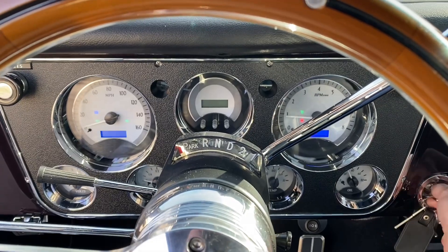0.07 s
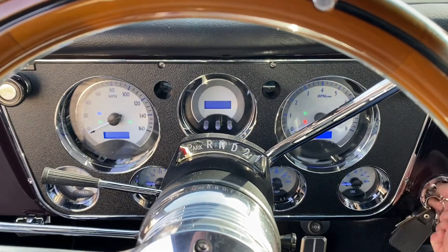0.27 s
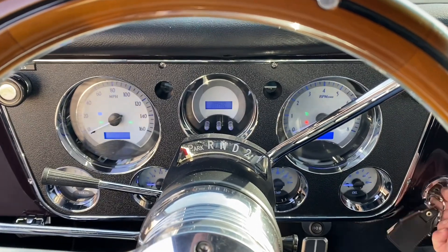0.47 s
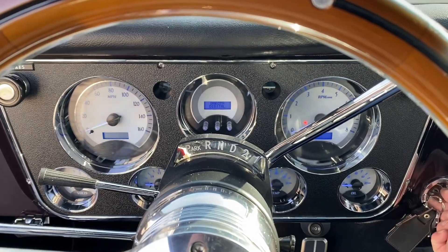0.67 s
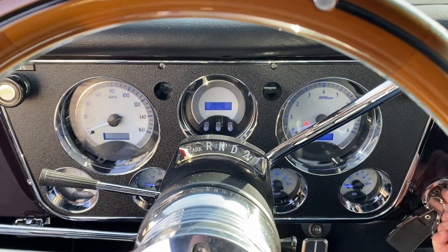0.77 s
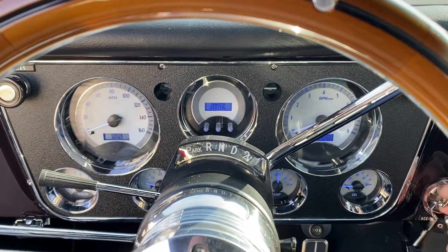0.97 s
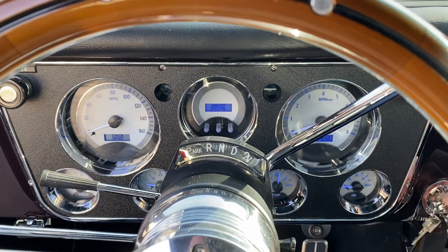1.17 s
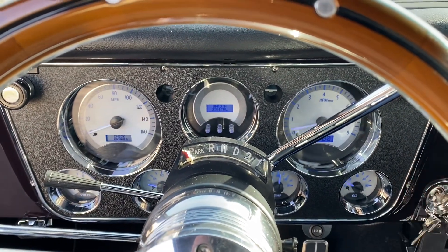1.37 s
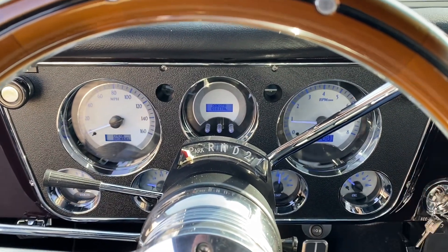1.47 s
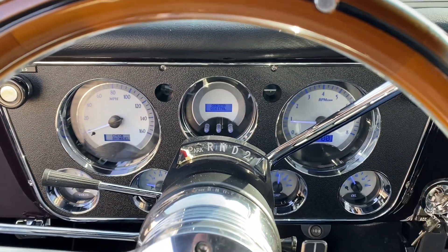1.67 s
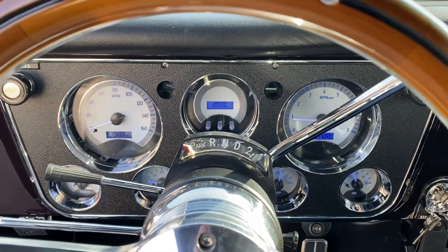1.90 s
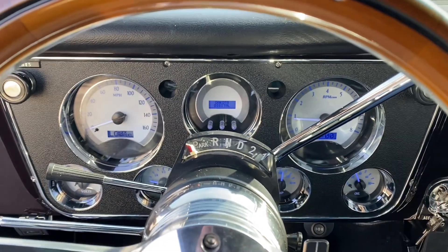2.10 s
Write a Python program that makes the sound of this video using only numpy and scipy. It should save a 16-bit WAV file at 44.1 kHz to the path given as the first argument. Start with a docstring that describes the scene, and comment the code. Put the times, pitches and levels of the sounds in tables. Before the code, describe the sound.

An eight-cylinder pickup engine starts, heard close inside the cab on a phone: small key and lock clicks, a very short rough starter whine, a breathy catch, then a loud, low, slightly hunting idle to the end.

```python
"""Cab of an eight-cylinder pickup, heard on a phone: the engine starts.
Key, lock and solenoid click: decaying noise and metal rings. The starter whines and cranks: a gliding rough
tone, its rasp, shaped noise and a hum. The intake gasps: noise paced by the firings. A hunting idle booms:
tones at one and two times the firing rate plus rung panels, over valve-gear hiss and a faint yard."""
import sys
import numpy as np
from scipy import signal
from scipy.fft import rfft, irfft
from scipy.io import wavfile
from scipy.ndimage import uniform_filter1d

SR = 44100
rng = np.random.default_rng(int(sys.argv[2]) if len(sys.argv) > 2 else 0)


def natural_amplitude(level_db):
    """Convert a level in decibels to a linear amplitude factor, elementwise."""
    exponent = np.asarray(level_db, float) / 20
    return 10 ** exponent


def waveform_to_disk(signal):
    """Save audio, clipped to [-1, 1], as 16-bit WAV at the path in sys.argv[1]."""
    frames = np.transpose(np.atleast_2d(signal))
    scaled = np.clip(frames, -1, 1) * 32767
    samples = np.round(scaled).astype(np.int16)
    wavfile.write(sys.argv[1], SR, samples)


N = 94374
T = np.arange(N) / SR
HZ = np.fft.rfftfreq(N, 1 / SR) + 1  # offset keeps the logarithm finite

# Yard background spectrum: f/Hz, relative density/dB
YARD_COLOUR = [(20, -49), (40, -8.5), (101, -2), (194, -20.5), (242, -16.5), (315, -29), (356, -21.5),
               (500, -27.5), (620, -38), (1750, -35.5), (5440, -64), (8000, -67), (10400, -104),
               (17600, -120)]
# Valve gear and belts: t/s, level/dB
VALVE_LEVEL = [(0.66, -36), (0.75, -40.5), (0.89, -31.5), (0.93, -35.5), (1.08, -40.5), (1.13, -34.5),
               (1.206, -41), (1.34, -39.5), (1.45, -45), (1.57, -45.5), (1.704, -40), (1.85, -42),
               (2.016, -42), (2.12, -43.5)]
# Valve gear spectrum: f/Hz, relative density/dB
VALVE_COLOUR = [(300, -22.5), (520, -6), (700, -2.5), (1100, -7), (1500, -8.5), (1900, -3.5), (2400, -5),
                (3000, -18), (5000, -27.5)]
# Air drawn through the intake, with valve gear: t/s, relative level/dB
INTAKE_LEVEL = [(.44, -49), (.55, -48.5), (.62, -42.5), (.7, -38), (.77, -32.5), (.82, -30), (.885, -27.5),
                (.92, -36.5), (1.0, -39.5), (1.07, -42.5), (1.135, -38.5), (1.21, -46), (1.3, -44.5),
                (1.41, -40), (1.52, -45.5), (1.6, -42), (1.65, -44), (1.75, -39), (1.82, -45),
                (1.89, -42.5), (1.94, -47), (1.985, -42), (2.03, -48), (2.14, -50.5)]
# Intake spectrum: f/Hz, relative density/dB
INTAKE_COLOUR = [(410, -17), (700, -12), (1420, -5), (2010, -9.5), (3070, -4), (5000, -6), (7640, -10.5),
                 (8360, -15.5), (9750, -10), (11000, -12.5), (13400, -24), (15100, -18)]
# Key, lock and solenoid clicks: t/s, peak level/dB of the noise part, t60/s
CLICKS = [(0, -44, 0.063), (0.163, -62.5, 0.13), (0.185, -46, 0.18), (0.236, -32, 0.11),
          (0.3207, -41, 0.11), (0.3503, -39, 0.24), (0.569, -27, 0.1), (0.949, -28, 0.042),
          (1.1237, -28.5, 0.067), (1.1667, -33, 0.086), (1.973, -45, 0.12)]
# Click spectrum: f/Hz, relative density/dB
CLICK_COLOUR = [(290, -23), (500, -11.5), (1240, 3), (3000, -2), (3270, -4.5), (3510, -4), (3670, -1.5),
                (8020, -15), (11000, -13.5), (15000, -32)]
# Ring of lock and solenoid: f/Hz, width/Hz, relative level/dB
LOCK_MODES = [(1264, 14, -1.5), (3290, 110, 0.5), (3830, 14, -2), (4090, 45, 0), (5210, 31, 0),
              (5910, 50, 2), (6710, 45, -11), (7840, 98, -4)]
# Starter: t/s, gear mesh f/Hz, whine level/dB, crank rumble level/dB, relative gear grind level/dB
STARTER = [(.345, 900, -47, -58, -44.5), (.37, 937, -36, -30, -36), (.395, 981.5, -40, -22, -38),
           (.42, 989.3, -41, -21.5, -35.5), (.43, 1155, -40, -23, -35), (.465, 1157, -35.5, -22.5, -37),
           (.478, 1316, -35.5, -21.5, -35.5), (.496, 1433, -28, -28, -36.5), (.51, 1422, -35, -30, -35),
           (.528, 1445, -26, -22.5, -35.5), (.547, 1452, -41, -24, -33), (.565, 1388, -31.5, -26.5, -37),
           (.595, 1374, -30, -21, -35.5), (.61, 1385, -39, -26.5, -39.5), (.622, 1375, -41, -26, -38.5),
           (.7, 1338, -67, -28.5, -39), (.8, 1316, -60, -29.5, -45)]
# Crank rumble resonances: f/Hz, width/Hz, relative level/dB
CRANK_MODES = [(48.7, 16, 4), (72.8, 23, 7), (128, 18, 2), (168.4, 33, -6.5)]
# Gear grind spectrum: f/Hz, relative density/dB
GRIND_COLOUR = [(150, 0), (250, -7.5), (705, -8.5), (1390, -8), (1560, -7), (2750, -15.5), (6920, -30.5),
                (8540, -52), (10400, -30), (12000, -69), (15600, -92), (22000, -120)]
# Motor hum, sags under load, climbs as the starter runs free: t/s, f/Hz, peak level/dB
MOTOR_HUM = [(.365, 140.1, -52), (.378, 133.4, -16.5), (.42, 121.6, -24), (.45, 120.7, -48),
             (.52, 128, -31), (.6, 128, -25), (.64, 138.8, -29), (.68, 158.8, -23), (.71, 168, -19.5),
             (.74, 163, -32), (.77, 161, -31)]
# Hunting idle: t/s, firing f/Hz
FIRING = [(0.76, 47.41), (0.82, 49.5), (0.902, 51.47), (0.978, 51.68), (1.128, 56.84), (1.152, 57.82),
          (1.298, 55.26), (1.432, 57.33), (1.594, 52.81), (1.604, 52.51), (1.724, 56.27), (1.74, 56.8),
          (1.886, 54.27), (1.912, 54.33), (1.996, 57.44), (2.008, 57.56), (2.1, 53.05), (2.14, 53.7)]
# Engine: t/s, boom level/dB at twice the firing rate, thump level/dB at the firing rate, body rumble level/dB
ENGINE = [(0.76, -23, -24, -30.5), (0.778, -21, -48, -31), (0.812, -19, -13, -24.5),
          (0.84, -20, -19.5, -27), (0.882, -21, -15, -23), (0.92, -5.5, -17, -24.5),
          (0.966, -21.5, -12.5, -24.5), (0.986, -7, -8, -20), (1.07, -11, -12, -26.5),
          (1.112, -9.5, -19, -20.5), (1.148, -5.5, -13.5, -29.5), (1.186, -10, -24, -23.5),
          (1.224, -8.5, -11, -21.5), (1.27, -8, -14.5, -30.5), (1.298, -8, -26, -22.5),
          (1.312, -6, -14, -27), (1.404, -9, -19, -21.5), (1.428, -8.5, -16, -28), (1.454, -6, -11, -21.5),
          (1.482, -10.5, -19.5, -26), (1.558, -10.5, -14.5, -27.5), (1.596, -6, -11.5, -24),
          (1.628, -14, -12.5, -26), (1.682, -7, -14, -21.5), (1.79, -9.5, -17.5, -26),
          (1.844, -11, -14, -26.5), (1.874, -5, -22.5, -23.5), (1.94, -11, -8, -26.5),
          (1.982, -7.5, -24, -21.5), (2.016, -8.5, -16, -29.5), (2.046, -14.5, -17, -26.5),
          (2.074, -9.5, -18, -24), (2.112, -10, -9.5, -26.5), (2.14, -13, -27, -34)]
# Body panel resonances: f/Hz, width/Hz, relative level/dB
PANEL_MODES = [(168, 26, 3), (207.4, 16.8, 1), (261, 41.6, -2.5), (338.7, 68, 1.5), (400.6, 26, -5),
               (444, 42.6, -4.5), (660, 244, -13)]
# Cab air resonance: f/Hz, width/Hz, relative level/dB
CAB_MODE = [(118.7, 10, 0)]
# Cab air rung by the ragged first firings: t/s, level/dB
CAB_MODE_LEVEL = [(.75, -45), (.78, -34), (.83, -15), (.87, -8), (.92, -16), (.95, -7), (1.0, -25),
                  (1.1, -46)]
# Dash and cab resonances added to every source: f/Hz, width/Hz, gain/dB
DASH_MODES = [(628.4, 9.9, 9.5), (844, 30, -6.5), (940, 48, -7), (1126, 41, 1), (1211, 15, -4.5),
              (1363, 16, -4.5), (1445, 20, -4), (1715, 14, -0.5), (1883, 21, 4.5), (3160, 47, -21),
              (4900, 310, -3.5)]
# Side signal gain: f/Hz, gain/dB
SIDE_GAIN = [(60, -7), (110, -17.5), (200, -3.5), (370, -8), (690, 0), (1270, 3), (2340, -1), (4320, -2),
             (7950, 1.5), (14600, -0.5)]
# Left over right: f/Hz, gain/dB
LEFT_OVER_RIGHT = [(30, -5.5), (60, -1.5), (250, -1), (600, -1), (1200, 3), (2500, 3.5), (5000, 3.5),
                   (8000, 0), (14000, -1)]
# Treble colour of the finished mix, dip near 8.5 kHz and gap near 12 kHz: f/Hz, gain/dB
TREBLE_COLOUR = [(20, 0), (8000, 0), (8500, -7), (9000, 0), (11200, 0), (11700, -6), (11800, -40),
                 (12350, -40), (12450, 0), (13800, 3), (14500, 0), (15200, -8), (22000, -10)]

YARD_DB, LOCK_DB = -40, -5
INTAKE_PUFF_DB, INTAKE_FLICKER_DB = 1, 2.96
CLICK_RISE_S, CLICK_GRIT_DB = 0.0028, 0  # no grit: smooth decays
MESH_ROUGH_HZ = (70, 10)  # rms pitch scatter at bite and at speed
MESH_SETTLE_START_S, MESH_SETTLE_LENGTH_S = 0.43, 0.05
MESH_FUZZ_HZ, MESH_FUZZ_DEPTH = 200, 0.35
SIDEBAND_OFFSET_HZ, SIDEBAND_DB = 190, -12
RASP_RATIO, RASP_BANDWIDTH_HZ = 2.2, 570
STARTER_FADE_S, CATCH_FADE_S = 0.18, 0.045
BOOM_LEAD_RAD = 0.14
PERIOD_SCATTER_CYCLES, FIRING_SCATTER_DB = 0.022, 1.8
PANEL_SCATTER_DB, PANEL_RATTLE_DB = 3, 2
ECHO_DB, ECHO_T60_S, ECHO_LOW_HZ = -7, 0.045, 408
SIDE_ECHO_SHARE = 0.78
CEILING, TOP_HZ = 1.15, 15150


def curve(table, col):
    """One column of a time table, joined by lines."""
    a = np.array(table, float)
    return np.interp(T, a[:, 0], a[:, col])


def over_hz(table):
    """Frequency table on the transform's bins, linear over log f."""
    a = np.array(table, float)
    return np.interp(np.log(HZ), np.log(a[:, 0]), a[:, 1])


def unit(x):
    """Scale to rms 1."""
    return x / np.sqrt(np.mean(x ** 2))


def noise(colour):
    """Noise of a given spectrum, rms 1."""
    return unit(irfft(rfft(rng.standard_normal(N)) * natural_amplitude(over_hz(colour)), N))


def rough(bandwidth_hz):
    """Low-passed noise, rms 1."""
    low = signal.butter(2, bandwidth_hz, fs=SR, output="sos")
    return unit(signal.sosfilt(low, rng.standard_normal(N)))


def ring(x, modes):
    """Resonances, each applied twice for dark valleys; sum at rms 1."""
    out = 0
    for hz, width_hz, db in modes:
        b, a = signal.iirpeak(hz, hz / width_hz, SR)
        twice = signal.lfilter(b, a, signal.lfilter(b, a, x))
        out = out + natural_amplitude(db) * unit(twice)
    return unit(out)


def walk(rate_hz):
    """Random levels held 1 / rate_hz s and slewed twice, rms 1."""
    k = int(SR / rate_hz)
    held = np.repeat(rng.standard_normal(N // k + 1), k)
    return unit(uniform_filter1d(uniform_filter1d(held, k), k)[:N])


def fade(start_s, length_s):
    """Ramp from 0 to 1."""
    return np.clip((T - start_s) / length_s, 0, 1)


def shaped(x, gain_db):
    """Smooth linear-phase filter, one dB gain per bin."""
    taps = signal.firwin2(2047, np.linspace(0, 1, len(HZ)), natural_amplitude(gain_db))
    return signal.fftconvolve(x, taps, "same")


def yard():
    """Faint low-heavy noise, drifting in level."""
    return natural_amplitude(YARD_DB + 1.2 * walk(5.8)) * noise(YARD_COLOUR)


def valves(phase):
    """Midrange noise of valve gear and belts, slightly paced by the firings."""
    db = curve(VALVE_LEVEL, 1) + 0.5 * np.cos(2 * np.pi * phase) + 1.6 * walk(24.93)
    return natural_amplitude(db) * noise(VALVE_COLOUR) * fade(VALVE_LEVEL[0][0] - 0.05, 0.14)


def intake(phase):
    """Air hiss, puffing once a firing and flickering."""
    puff_db = INTAKE_PUFF_DB * np.cos(2 * np.pi * phase)
    db = curve(INTAKE_LEVEL, 1) + 0.63 + puff_db + INTAKE_FLICKER_DB * walk(17.47)
    return natural_amplitude(db) * noise(INTAKE_COLOUR) * fade(INTAKE_LEVEL[0][0] - 0.1, 0.14)


def clicks():
    """Broadband noise and metal rings under exponentially decaying envelopes."""
    envelope = 0
    for start_s, db, t60_s in CLICKS:
        decay = natural_amplitude(db - 60 * np.maximum(T - start_s, 0) / t60_s)
        envelope = envelope + decay * fade(start_s, CLICK_RISE_S)
    grit = natural_amplitude(CLICK_GRIT_DB * walk(400))
    snap = noise(CLICK_COLOUR)
    metal = natural_amplitude(LOCK_DB) * ring(rng.standard_normal(N), LOCK_MODES)
    return envelope * grit * (snap + metal)


def starter():
    """Unsteady pinion whine, its rasp, gear grind, motor hum, and the block rocking on its mounts."""
    settled = fade(MESH_SETTLE_START_S, MESH_SETTLE_LENGTH_S)
    scatter_hz = np.interp(settled, (0, 1), MESH_ROUGH_HZ) * walk(70)
    turn = 2 * np.pi * np.cumsum(curve(STARTER, 1) + scatter_hz) / SR

    whine_level = np.sqrt(2) * natural_amplitude(curve(STARTER, 2) + 1.4 * walk(60.6))
    sideband = natural_amplitude(SIDEBAND_DB + 3.1 * walk(40)) * np.sin(turn - 2 * np.pi * SIDEBAND_OFFSET_HZ * T)
    whine = whine_level * (np.sin(turn) + sideband)
    whine = whine * (1 + MESH_FUZZ_DEPTH * rough(MESH_FUZZ_HZ))

    # rough upper partials of the mesh
    rasp = rough(RASP_BANDWIDTH_HZ) * np.sin(RASP_RATIO * turn) * (1 - fade(0.606, 0.093))
    grind = natural_amplitude(curve(STARTER, 4)) * (natural_amplitude(3.0) * noise(GRIND_COLOUR) + rasp)
    crank = natural_amplitude(curve(STARTER, 3)) * ring(rng.standard_normal(N), CRANK_MODES)
    hum = natural_amplitude(curve(MOTOR_HUM, 2)) * np.sin(2 * np.pi * np.cumsum(curve(MOTOR_HUM, 1)) / SR)
    hum = hum * fade(MOTOR_HUM[0][0], 0.026)
    on = fade(STARTER[0][0], 0.0034) * (1 - fade(STARTER[-1][0], STARTER_FADE_S))
    return on * (whine + grind + crank + hum)


def engine():
    """Uneven firings: cab boom, thump, ringing panels and cab air; also returns the firing phase/cycles."""
    even = np.cumsum(curve(FIRING, 1)) / SR
    period_draw, boom_draw, thump_draw, pulse_draw = rng.standard_normal((200, 4)).T

    def per_firing(draw):
        """Draws joined by lines from firing to firing."""
        return np.interp(even, np.arange(200), draw)

    def size(draw):
        """Tone amplitude scattered per firing."""
        return np.sqrt(2) * natural_amplitude(FIRING_SCATTER_DB * per_firing(draw))

    cycles = even + PERIOD_SCATTER_CYCLES * per_firing(period_draw)
    boom = size(boom_draw) * np.cos(4 * np.pi * cycles + BOOM_LEAD_RAD) * natural_amplitude(curve(ENGINE, 1))
    thump = size(thump_draw) * np.cos(2 * np.pi * cycles) * natural_amplitude(curve(ENGINE, 2))

    count = np.floor(cycles).astype(int)
    pulses = np.diff(count, prepend=0) * natural_amplitude(PANEL_SCATTER_DB * pulse_draw[count])
    drive = unit(pulses) + natural_amplitude(PANEL_RATTLE_DB) * rng.standard_normal(N)
    panels = ring(drive, PANEL_MODES) * natural_amplitude(curve(ENGINE, 3))
    cab_air = ring(pulses, CAB_MODE) * natural_amplitude(curve(CAB_MODE_LEVEL, 1))
    caught = fade(ENGINE[0][0] - CATCH_FADE_S, CATCH_FADE_S)
    return (boom + thump + panels + cab_air) * caught, cycles % 1


def dash(x):
    """Parallel resonances of dash and cab, excited by x."""
    out = 0
    for hz, width_hz, db in DASH_MODES:
        b, a = signal.iirpeak(hz, hz / width_hz, SR)
        out = out + natural_amplitude(db) * signal.lfilter(b, a, x)
    return out


def cab():
    """All sources at one spot in the cab, with the dash ringing along."""
    motor, phase = engine()
    x = motor + starter() + intake(phase) + valves(phase) + clicks() + yard()
    return x + dash(x)


def echoes(x):
    """Scattered treble echoes: a short decaying random tail of unit energy."""
    t = T[:8000]
    high = signal.butter(2, ECHO_LOW_HZ, "high", fs=SR, output="sos")
    tail = signal.sosfilt(high, rng.standard_normal(len(t)) * natural_amplitude(-60 * t / ECHO_T60_S))
    return signal.fftconvolve(x, tail / np.sqrt(np.sum(tail ** 2)))[:N]


def scene():
    """Stereo cab: mid with echoes; side from other echoes and an independently drawn cab."""
    near = cab()
    mid = near + natural_amplitude(ECHO_DB) * echoes(near)
    side_echo = SIDE_ECHO_SHARE * echoes(near)
    loose = np.sqrt(1 - SIDE_ECHO_SHARE ** 2) * cab()
    side = shaped(side_echo + loose, over_hz(SIDE_GAIN))
    half_db = over_hz(LEFT_OVER_RIGHT) / 2
    return np.array([shaped(mid + side, half_db), shaped(mid - side, -half_db)])


def top_cut(x):
    """Nothing passes above the cut-off."""
    return signal.sosfilt(signal.butter(12, 15240, fs=SR, output="sos"), x)


def record(dry):
    """Rounds the peaks, shapes the treble with a dip and a gap, and cuts the top."""
    rounded = CEILING * np.tanh(dry / CEILING)
    coloured = [shaped(x, over_hz(TREBLE_COLOUR)) for x in rounded]
    low_pass = signal.ellip(8, 0.2, 60, TOP_HZ, fs=SR, output="sos")
    mix = signal.sosfilt(low_pass, coloured)
    return top_cut(mix)


dry = scene()
out = record(dry)
waveform_to_disk(out)
```